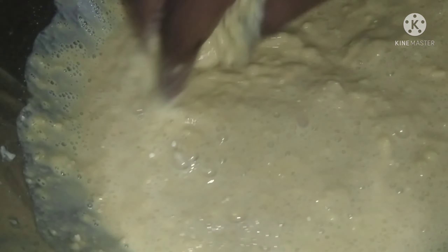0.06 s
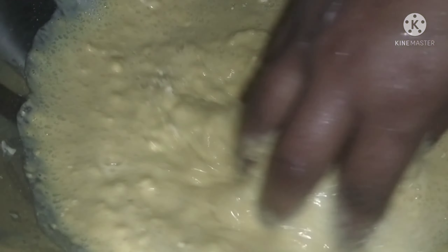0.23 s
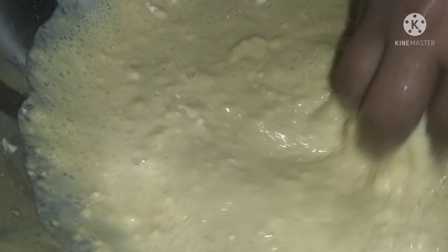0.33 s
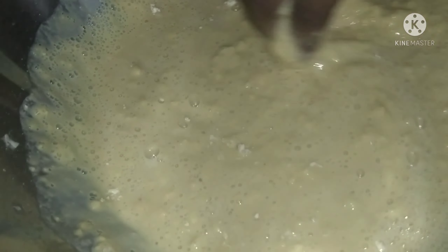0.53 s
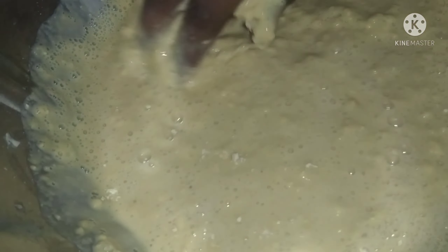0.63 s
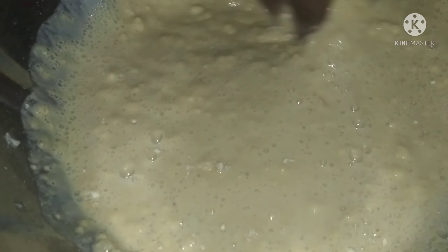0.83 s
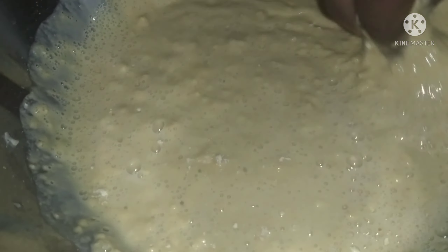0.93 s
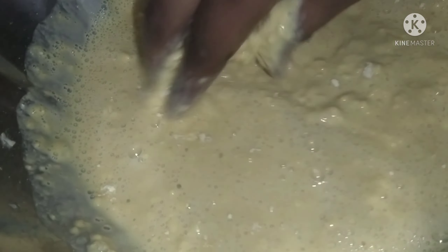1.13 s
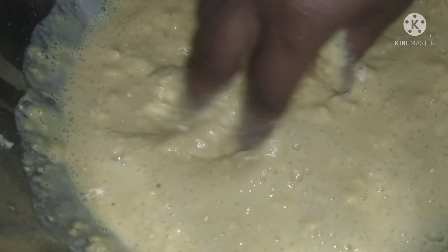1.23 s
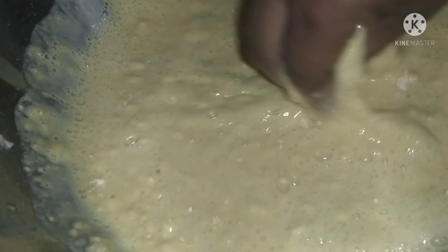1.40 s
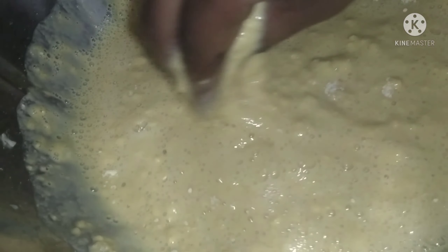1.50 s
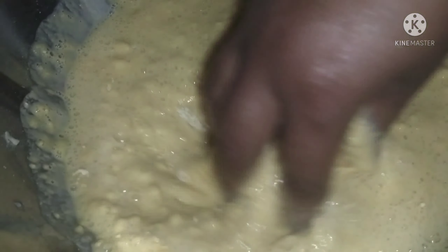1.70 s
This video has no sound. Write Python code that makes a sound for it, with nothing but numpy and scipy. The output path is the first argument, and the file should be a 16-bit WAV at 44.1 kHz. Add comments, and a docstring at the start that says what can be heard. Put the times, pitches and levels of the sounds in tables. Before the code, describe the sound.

A quick cluster of finger knocks on a metal bowl rings briefly, followed by two lighter taps. Around them, hand-stirred wet batter gives small ticks and crackles over faint room noise, heard close up in an echoing kitchen.

```python
"""In an echoing kitchen, a hand stirs wet batter in a metal bowl, close by.
Over a faint room noise and a thin sizzle, a soft hollow note comes and goes with the stirring.
The batter crackles as it is squeezed and gives small pops and ticks.
Loudest are the fingers, which knock on the bowl a few times in quick succession; the metal shivers
and rings, but the batter damps the ring. Two light knocks on the bowl follow."""
import sys
import numpy as np
from scipy import signal
from scipy.fft import rfft, irfft, next_fast_len
from scipy.io import wavfile
from scipy.ndimage import map_coordinates

SR = 44100
rng = np.random.default_rng(int(sys.argv[2]) if len(sys.argv) > 2 else 0)


def file_out(sig):
    """Save sig as 16-bit WAV at sys.argv[1]."""
    # one column per channel
    cols = np.atleast_2d(sig).T
    # limit, then scale
    lim = np.clip(cols, -1, 1)
    pcm = np.round(lim * 32767).astype(np.int16)
    wavfile.write(sys.argv[1], SR, pcm)


N = 77175  # 1.75 seconds

# A spectrum says how strong the low and high frequencies are, compared with each other.
# the room noise (frequency [Hz], level [dB])
ROOM_NOISE_SPECTRUM = [(25, -33), (45, -25), (70, -3), (120, -0.5), (200, -7), (320, -13.5), (480, -0.5),
                       (850, 1), (1150, 1.5), (1350, -7), (1550, -28), (1750, -32), (1950, -11.5),
                       (2100, -26), (2400, -5.5), (3100, -19.5), (3500, -18), (3850, -47), (4150, -9.5),
                       (4450, -24), (4800, -18), (5700, -26.5), (6400, -11.5), (6800, -24), (7400, -13.5),
                       (8800, -33.5), (10500, -42.5), (15000, -42)]
# the thin, high sizzle (frequency [Hz], level [dB])
SIZZLE_SPECTRUM = [(5500, -49), (6800, -29), (7200, 1), (7500, -2.5), (7800, -16.5), (8200, -8.5),
                   (9000, -37)]
# how long the kitchen echoes (frequency [Hz], time to fade by 60 dB [s])
KITCHEN_FADE_TIMES = [(150, 1), (500, 1), (1200, 0.61), (3000, 0.5), (7000, 0.41), (12000, 0.17)]
# the hollow note of the stirring (frequency [Hz], level [dB])
HOLLOW_SPECTRUM = [(150, -82), (250, -26), (300, -7), (335, -6), (390, -16.5), (520, -36), (1000, -61)]
# how that note swells and sinks (time [s], level [dB])
HOLLOW_LEVELS = [(0.0, -63.5), (0.068, -60.5), (0.126, -67.5), (0.286, -60), (0.384, -65.5), (0.828, -66),
                 (0.964, -105), (1.028, -64.5), (1.154, -85.5), (1.246, -73.5), (1.432, -77.5),
                 (1.476, -61.5), (1.534, -76), (1.554, -66), (1.7, -72), (1.75, -90.5)]
# strokes that squeeze the batter (time of the peak [s], level [dB], half length [s])
SQUEEZES = [(0.015, -55.5, 0.0062), (0.054, -64.5, 0.015), (0.344, -45.5, .022), (0.587, -66, 0.089),
            (0.801, -58, 0.008), (1.09, -65, 0.019), (1.466, -65.5, 0.0185), (1.594, -67, .012)]
# one tiny wet crackle (frequency [Hz], level [dB])
CRACKLE_SPECTRUM = [(100, -22), (500, 2), (1200, 2.5), (1700, -12), (2000, 2.5), (2600, 1.5), (3300, -6),
                    (3850, -14), (4300, -4), (5300, -5.5), (6200, -7), (6750, -8.5), (7400, 5), (8600, -19),
                    (10000, -16.5), (14000, -31.5)]
# small pops and ticks in the batter, and two light knocks on the bowl at 0.5029 and 0.5785 s
# (time [s], level [dB], pitch [Hz], rise time [s], snap compared with the tone [dB])
POPS_AND_LIGHT_KNOCKS = [(0.0085, -47, 2343, 0.0016, -9), (0.0139, -38, 7400, 0.00017, -6),
                         (.0540, -63, 6400, 0.00052, -18), (0.098, -54.5, 7600, 0.00025, -15),
                         (0.344, -31, 6830, 0.00054, -18), (0.3592, -36, 6940, 0.0004, 1),
                         (0.365, -38.5, 7380, 0.0016, -9), (0.3971, -25, 1330, 0.00069, -8.5),
                         (0.485, -49, 7200, 0.00023, -7), (0.5029, -32, 3130, 0.00027, -11.5),
                         (0.5084, -41, 3150, 0.00012, -15), (0.5785, -32.5, 2450, .00018, -3),
                         (0.5776, -46, 6960, 0.00042, -22), (0.602, -47, 5170, 0.00013, -5),
                         (0.625, -47, 7430, 0.00044, -18), (0.6968, -51, 7700, 0.00018, -4),
                         (.7550, -55, 2330, 0.00018, -2.5), (0.797, -56.5, 1512, 0.0019, -0.5),
                         (0.8086, -51, 3110, .0003, -9), (0.8633, -54, 3100, 0.00012, -11),
                         (1.0108, -33.5, 7250, 0.0003, -13), (1.0103, -57, 3220, 0.00025, -14),
                         (1.0215, -50, 4200, 0.00014, -10), (1.0386, -46, 7550, 0.00036, -4),
                         (1.074, -47.5, 3110, 0.00033, -3), (1.0966, -63, 2300, .0006, -14),
                         (1.107, -52.5, 2680, 0.00019, -1), (1.2008, -39.5, 6830, 0.00025, -18.5),
                         (1.4358, -38.5, 7180, 0.00019, -24), (1.443, -45.5, 3130, 0.00092, -17.5),
                         (1.4520, -48, 2360, 0.00039, -17), (1.4743, -54.5, 2500, 0.00041, -8),
                         (1.5122, -38.5, 1880, 0.00028, -16), (1.5161, -45, 2530, 0.00018, -3.5),
                         (1.513, -48.5, 7440, 0.0004, -8), (1.521, -54, 2950, 0.00025, -3)]
# the snap that starts each pop, tick or light knock (frequency [Hz], level [dB])
SNAP_SPECTRUM = [(100, -42), (400, -16), (900, -7.5), (3000, 15), (5000, 9.5), (7500, 18.5), (10000, -8.5),
                 (11500, -27.5), (15000, -41)]
# a finger meeting the bowl (frequency [Hz], level [dB])
CONTACT_SPECTRUM = [(40, -46.5), (150, -32), (350, -17.5), (600, -3), (1250, -0.5), (2100, -4.5), (3100, 8),
                    (4200, 3), (5400, -8.5), (7300, -4.5), (9000, -16.5), (12000, -38), (15500, -36)]
# the dense, quickly damped shiver of the bowl's wall (frequency [Hz], level [dB])
WALL_SPECTRUM = [(40, -42), (110, -30), (175, -10), (240, -23), (550, -5), (800, -5), (1250, 6),
                 (1800, -3.5), (2050, 1), (2900, -3.5), (3900, -8), (4300, 1), (4650, -9), (5500, -8),
                 (5950, -3), (6500, -8), (7350, -1.5), (7900, -11), (8600, -18), (12000, -36), (15500, -47)]
# the tones the bowl rings with (frequency [Hz], level [dB], time to fade by 60 dB [s])
BOWL_TONES = [(511, -16, .9), (631, -11, .6), (969, -6, .55), (1089, -7, .5), (1165, -3, .5), (1231, 0, .7),
              (1258, -5, .45), (1305, -4, .4), (1337, 1, .38), (1481, -7, .35), (1674, -2, .3),
              (1990, -10, .35), (2530, -6, .28), (2831, -3, .29), (2853, -4, .29), (3028, -4, .37),
              (3291, -3, .29), (4375, -5, .3)]
# fingers knocking on the bowl
# (time [s], level [dB], treble cutoff [Hz], shiver and ring [dB], pitch the struck spot leaves out [Hz])
FINGER_KNOCKS = [(.2449, -3.5, 9400, 3.5, 2080), (.2864, 0, 6060, -1.5, 5400),
                 (.3020, -6.5, 8000, -0.5, 5460), (.3105, -12, 4500, 4, 5500),
                 (.3158, -21, 3000, -1.5, 5440), (.3980, -22.5, 2500, -6, 3700)]

WALL_DELAY_S = 0.0008  # the bowl's wall answers this much later
FINGER_ECHO_DB, SMALL_SOUND_ECHO_DB = -7, -10  # how strongly the kitchen answers


def amp(db):
    """Turn decibels into a number to multiply by."""
    return 10 ** (np.asarray(db) / 20)


def unit(x):
    """Scale a signal to an average strength (rms) of 1."""
    return x / np.sqrt(np.mean(x ** 2) + 1e-20)


def value_at(table, hz):
    """Read between the rows of a table, on a logarithmic frequency scale."""
    frequencies, values = np.transpose(table)
    return np.interp(np.log(hz + 1), np.log(frequencies + 1), values)


def click(spectrum, size=4096):
    """A click of energy 1 with the given spectrum."""
    gains = amp(value_at(spectrum, np.fft.rfftfreq(size, 1 / SR)))
    cepstrum = irfft(np.log(gains))
    # folding the second half onto the first packs the sound at the start
    cepstrum[1:size // 2] *= 2
    cepstrum[size // 2 + 1:] = 0
    pulse = irfft(np.exp(rfft(cepstrum)))
    return pulse / np.linalg.norm(pulse)


def through(x, response):
    """Let every sample of x set off a copy of the response (convolution)."""
    return signal.fftconvolve(x, response)[:N]


def noise(spectrum):
    """Steady noise of strength 1 with the given spectrum."""
    gains = amp(value_at(spectrum, np.fft.rfftfreq(N, 1 / SR)))
    return unit(irfft(rfft(rng.standard_normal(N)) * gains, N))


def fade(t, fade_s):
    """A curve that falls by 60 dB every fade_s seconds."""
    return np.exp(-np.log(1000) * t / fade_s)


def wobble(per_s):
    """A smooth curve through per_s random points a second."""
    return map_coordinates(rng.standard_normal(400), [np.arange(N) * per_s / SR], mode="mirror")


def add(out, start_s, x):
    """Mix x into out, beginning at start_s."""
    first = max(0, round(start_s * SR))
    out[first:first + len(x)] += x[:N - first]


def background():
    """Faint room noise wavers slowly, and a thin sizzle flickers on top."""
    air = amp(-70.5 + 1.8 * wobble(per_s=9)) * noise(ROOM_NOISE_SPECTRUM)
    sizzle = amp(-79.5 + 4.5 * wobble(per_s=22)) * noise(SIZZLE_SPECTRUM)
    return air + sizzle


def kitchen_echo(rise_s=0.0017):
    """The kitchen's echoes blur into a tail of noise whose treble dies first."""
    hz, t, bands = signal.stft(rng.standard_normal(SR), SR, nperseg=256)
    fade_s = value_at(KITCHEN_FADE_TIMES, hz)[:, None]
    tail = signal.istft(bands * fade(t, fade_s), SR)[1]
    tail *= 1 - np.exp(-np.arange(len(tail)) / SR / rise_s)
    return tail / np.linalg.norm(tail)


def bowl_echo(fade_s, size=4096):
    """Sound bounces around the bowl in a short, dense burst of echoes."""
    t = np.arange(size) / SR
    burst = rng.standard_normal(size)
    for _ in range(2):
        spectrum = rfft(burst * fade(t, fade_s))
        burst = irfft(spectrum / (abs(spectrum) + 1e-9))  # make all frequencies equally strong
    burst *= fade(t, 2 * fade_s)
    return burst / np.linalg.norm(burst)


def hollow_note(gain_db=-1.5):
    """A soft, low band of noise comes and goes with the stirring."""
    times, levels = np.transpose(HOLLOW_LEVELS)
    level_db = np.interp(np.arange(N) / SR, times, levels)
    return amp(gain_db + level_db) * noise(HOLLOW_SPECTRUM)


def batter_crackle(crackles_per_s=700, stir_db=-91.5):
    """Tiny wet crackles go on all the time and swell with each squeeze."""
    t = np.arange(N) / SR
    swells = sum(amp(db) * np.exp(-0.5 * ((t - peak_s) / half_s) ** 2) for peak_s, db, half_s in SQUEEZES)
    sizes_db = np.minimum(2.5 * rng.exponential(size=N), 15)  # many small, a few big
    signs = rng.choice([-1, 1], N)
    happens = rng.random(N) < crackles_per_s / SR
    steady = unit(through(amp(sizes_db) * signs * happens, click(CRACKLE_SPECTRUM)))
    crackle = (amp(stir_db) + swells) * steady
    return crackle + amp(SMALL_SOUND_ECHO_DB) * through(crackle, kitchen_echo())


def pops_and_light_knocks(snap_s=0.00077, bowl_echo_db=-2):
    """Pops and ticks in the batter and two light knocks on the bowl: each a snap and a tone, echoed."""
    out, t = np.zeros(N), np.arange(SR // 20) / SR
    snap_click = click(SNAP_SPECTRUM)
    for start_s, db, hz, rise_s, snap_db in POPS_AND_LIGHT_KNOCKS:
        burst = rng.standard_normal(len(t)) * np.exp(-t / snap_s)
        snap = through(burst, snap_click)[:len(t)]
        swell = t / rise_s * np.exp(1 - t / rise_s)
        tone = swell * np.sin(2 * np.pi * hz * t)
        sound = amp(db) * (tone + amp(snap_db) * snap)
        add(out, start_s, sound)
        add(out, start_s + WALL_DELAY_S, amp(bowl_echo_db) * through(sound, bowl_echo(fade_s=0.052)))
        add(out, start_s, amp(SMALL_SOUND_ECHO_DB) * through(sound, kitchen_echo()))
    return out


def bowl_ring():
    """The struck metal rings with many tones, each dying away at its own speed."""
    t = np.arange(SR) / SR
    return sum(amp(db) * fade(t, fade_s) * np.sin(2 * np.pi * (hz * t + rng.random()))
               for hz, db, fade_s in BOWL_TONES)


def finger_knocks(shiver_db=-1.5, ring_db=-39.5, gap_width_hz=530):
    """Each knock is a sharp contact, a shiver of the wall and a faint ring; the soft ones are duller."""
    out = np.zeros(N)
    contact, wall = click(CONTACT_SPECTRUM), click(WALL_SPECTRUM)
    for start_s, db, cutoff_hz, metal_db, gap_hz in FINGER_KNOCKS:
        knock = np.zeros(N)
        add(knock, 0, contact)
        add(knock, 0, amp(metal_db + ring_db) * bowl_ring())
        shiver = through(bowl_echo(fade_s=0.031), wall)
        add(knock, WALL_DELAY_S, amp(metal_db + shiver_db) * shiver)
        add(knock, 0, amp(FINGER_ECHO_DB) * through(kitchen_echo(), wall))
        # cut out the pitch that the struck spot does not set ringing
        knock = signal.lfilter(*signal.iirnotch(gap_hz, gap_hz / gap_width_hz, SR), knock)
        smoothing = np.exp(-2 * np.pi * cutoff_hz / SR)  # more smoothing, less treble
        knock = signal.lfilter([1 - smoothing], [1, -smoothing], knock)
        add(out, start_s, amp(db) * knock)
    return out


def scene(muffle_hz=9780):
    """Mix everything into one channel; the batter takes the edge off the small sounds."""
    knocks = finger_knocks()
    muffle = signal.butter(4, muffle_hz, fs=SR, output="sos")
    small_sounds = signal.sosfilt(muffle, pops_and_light_knocks() + batter_crackle())
    return (knocks + small_sounds + hollow_note() + background())[None]


def record(dry, low_cut_hz=65, top_hz=15800):
    """Turn down the deep bass and remove the very highest treble."""
    bass_cut = signal.butter(4, low_cut_hz, "high", fs=SR, output="sos")
    sound = signal.sosfilt(bass_cut, dry)
    padded_size = next_fast_len(N + SR // 2)
    below_top = np.fft.rfftfreq(padded_size, 1 / SR) < top_hz
    return irfft(rfft(sound, padded_size) * below_top, padded_size)[..., :N]


dry = scene()
out = record(dry)
file_out(out)
```